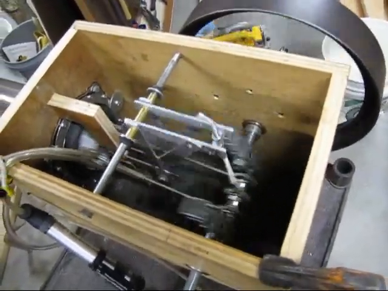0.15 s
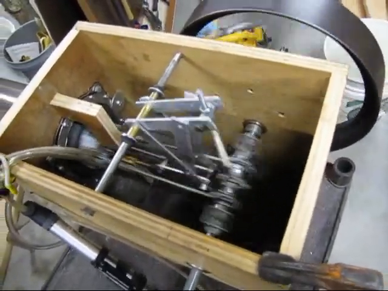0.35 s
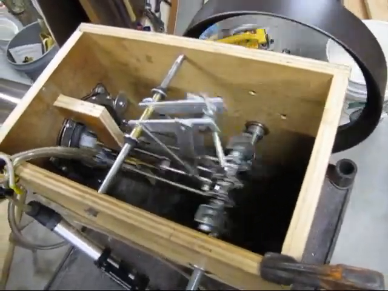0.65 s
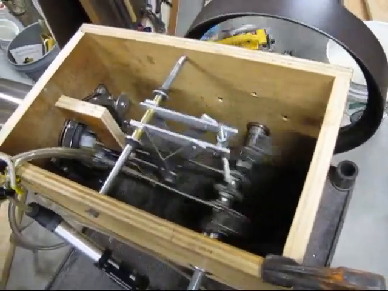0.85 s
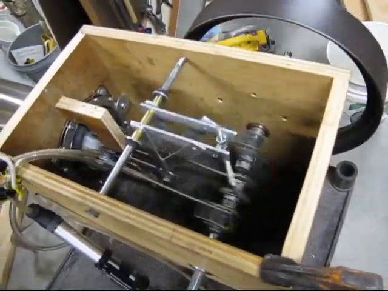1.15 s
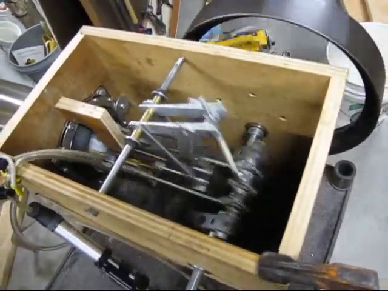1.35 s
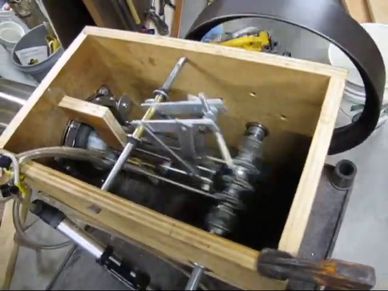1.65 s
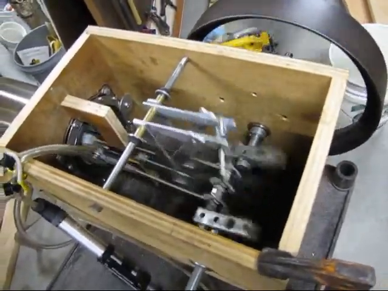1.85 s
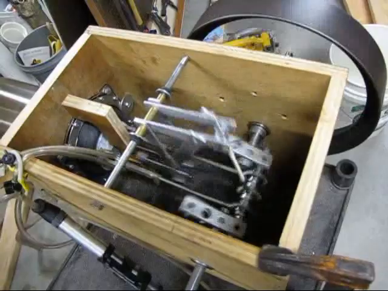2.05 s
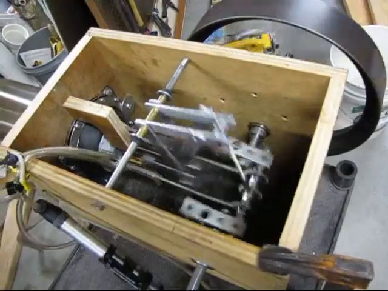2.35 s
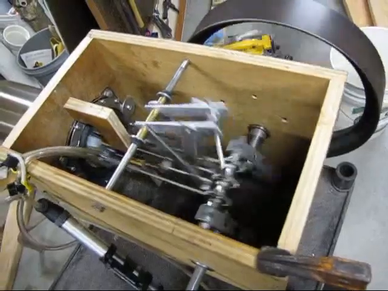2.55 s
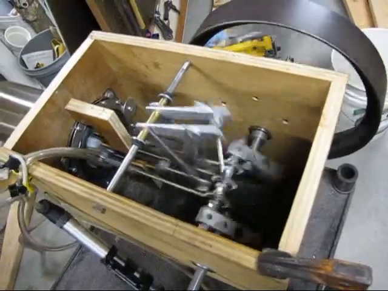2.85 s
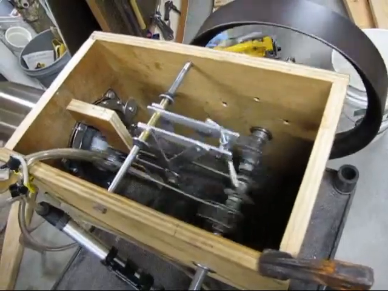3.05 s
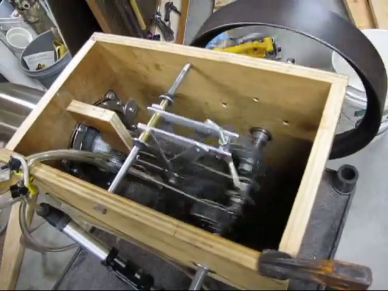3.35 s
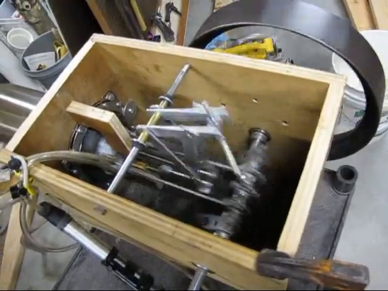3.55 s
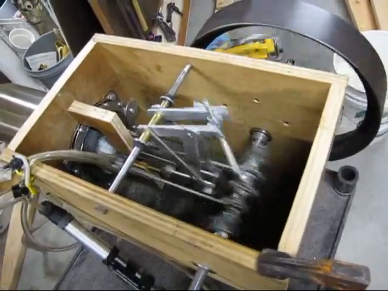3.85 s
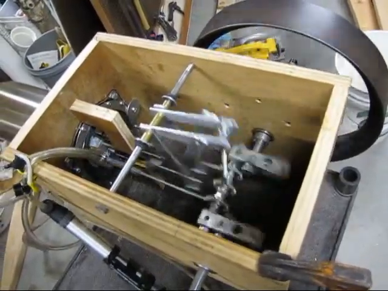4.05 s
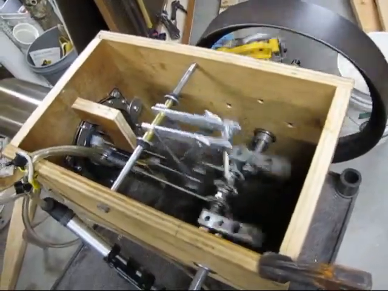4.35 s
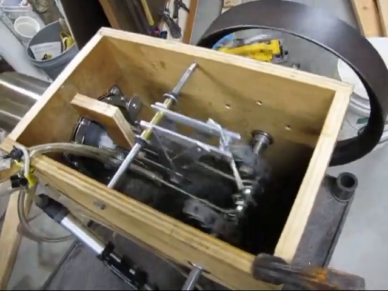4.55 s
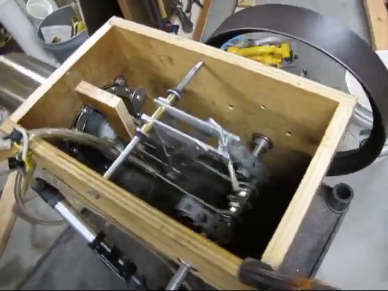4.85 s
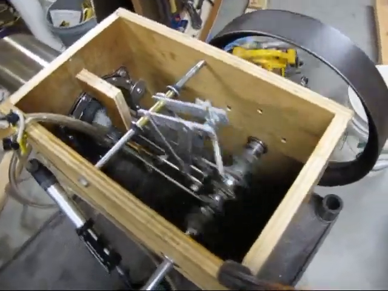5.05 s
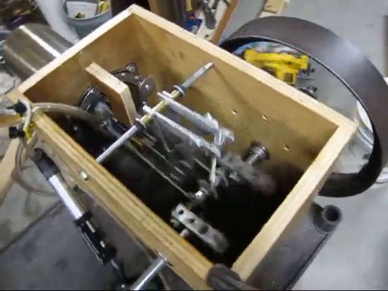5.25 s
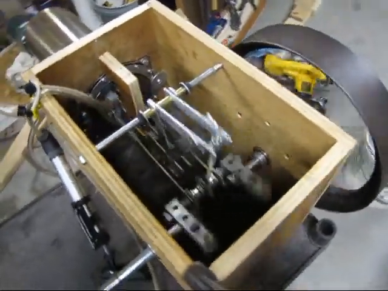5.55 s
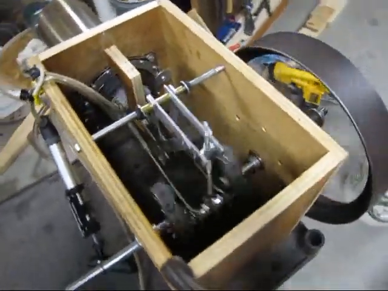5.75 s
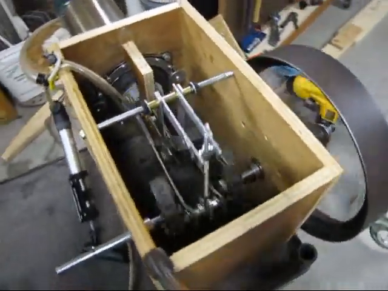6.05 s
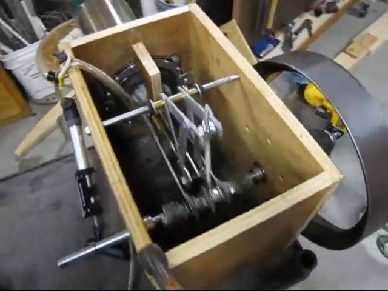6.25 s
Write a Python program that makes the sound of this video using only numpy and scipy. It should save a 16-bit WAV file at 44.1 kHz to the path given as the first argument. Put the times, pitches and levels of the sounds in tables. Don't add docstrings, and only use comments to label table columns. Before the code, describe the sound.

Close metallic ticking, woody thumps and airy puffs repeat about three times a second while a steady burner flame hums behind, then shuts off.

```python
import sys
import numpy as np
from scipy import signal
from scipy.fft import rfft, irfft, next_fast_len
from scipy.io import wavfile
from scipy.ndimage import uniform_filter1d

SR = 44100
rng = np.random.default_rng(int(sys.argv[2]) if len(sys.argv) > 2 else 0)


def nominal_scale(level):
    x = np.asarray(level, float) / 20
    return 10 ** x


def master(y):
    cut = np.clip(np.atleast_2d(y).T, -1, 1)
    pcm = np.round(cut * 32767)
    wavfile.write(sys.argv[1], SR, pcm.astype(np.int16))


N = 282681


def colour(x, points):
    hz, db = np.transpose(points)
    size = next_fast_len(x.shape[-1])
    bins = np.fft.rfftfreq(size, 1 / SR) + 1
    gain = nominal_scale(np.interp(np.log(bins), np.log(hz), db))
    y = irfft(rfft(x, size) * gain, size)[..., :x.shape[-1]]
    return y * np.sqrt(np.mean(x ** 2) / np.mean(y ** 2))


def strikes(times, db):
    train = np.zeros(N)
    places = np.clip((np.asarray(times) * SR).astype(int), 0, N - 1)
    np.add.at(train, places, nominal_scale(db))
    return train


def contact(train, rise_s, fall_s, grit):
    t = np.arange(int(.1 * SR)) / SR
    shape = (1 - np.exp(-(t / rise_s) ** 2)) * np.exp(-t / fall_s)
    shape /= np.sqrt(np.sum(shape ** 2))
    grains = rng.standard_normal(N) * nominal_scale(grit * rng.exponential(size=N))
    return signal.fftconvolve(train, shape)[:N] * grains / grains.std()


def ring(force, modes, lag_s, spread, pan_db):
    out = np.zeros((2, N))
    force = np.atleast_2d(force)
    for k, (hz, db, t60) in enumerate(modes):
        sign = (-1) ** k
        pole = np.exp(2j * np.pi * hz / SR - np.log(1000) / (t60 * SR))
        z = sign * nominal_scale(db) * signal.lfilter([1], [1, -pole], force)
        turn = np.pi * hz * lag_s + spread * sign
        left = nominal_scale(pan_db / 2) * (z[0] * np.exp(-1j * turn)).imag
        right = nominal_scale(-pan_db / 2) * (z[-1] * np.exp(1j * turn)).imag
        out += np.array([left, right])
    return out


def wide_noise(cross_hz):
    mid, side = rng.standard_normal((2, N))
    side = signal.sosfilt(signal.butter(1, cross_hz, "high", fs=SR, output="sos"), side)
    return np.array([mid + side, mid - side]) / np.sqrt(2)


def walk(rate):
    k = int(SR / rate)
    return uniform_filter1d(np.repeat(rng.standard_normal(N // k + 1), k), k)[:N]


def apart(force, share):
    t = np.arange(256) / SR
    echo = rng.standard_normal(len(t)) * np.exp(-t / 0.0031)
    echo /= np.sqrt(np.sum(echo ** 2))
    side = share * signal.fftconvolve(force, echo)[:N] * np.sign(walk(150))
    return np.array([force + side, force - side]) / np.sqrt(1 + share ** 2)


# main blow in seconds, then level above usual in dB of the blow, the rebound,
# the link swinging in and the link swinging back.
TURNS = [(0.1503, 2, -1, -5, -21), (0.478, 0.5, 0.5, -10, -25), (0.803, 0.5, -2, -19, -29),
         (1.1266, 0, -1.5, -25, -26), (1.4504, 2, -2, -21, -24), (1.7708, 1.5, -0.5, -16, -16),
         (2.087, 2, 0, 1, 5), (2.4032, 2, 0, -19, 0), (2.7189, 2.5, 0.5, -21, 3), (3.031, 0, -4.5, 4.5, 9),
         (3.339, 0.5, -2, -5, -0.5), (3.6508, 2, -2, 2, 7), (3.9566, 2, 3, 0.5, 2),
         (4.2634, 2.5, 2, -2, 1.5), (4.565, 3, 3.5, 0, 5), (4.868, 1, 2.5, -4, 3),
         (5.1671, -0.5, -6, 1, 5.5), (5.4685, 1.5, -2, 4.5, -0.5), (5.7664, -0.5, -7, 1, 5.5),
         (6.061, -3.5, -3.5, -0.5, 2), (6.3538, -3.5, -3, 1, 0.5)]
STAGES = ("free", "blow", "rebound", "in", "back")


def each_turn(parts):
    jitter_s, scatter_db = .001, 1.5
    table = np.array(TURNS, float)
    blow_s = table[:, 0].copy()
    s = np.concatenate([[2 * blow_s[0] - blow_s[1]], blow_s, [2 * blow_s[-1] - blow_s[-2]]])
    table[:, 0] = 0
    turn = np.arange(len(table))
    age = turn / turn[-1]
    rows = []
    for stage, first, last, first_db, last_db, *more in parts:
        chance = rng.standard_normal((2, len(turn)))
        place = turn + first + (last - first) * age
        at = np.interp(place, np.arange(len(s)) - 1, s) + jitter_s * chance[0]
        db = first_db + (last_db - first_db) * age
        db = db + table[:, STAGES.index(stage)] + scatter_db * chance[1]
        rows.append(np.array([at, db] + [m + 0 * at for m in more]))
    rows = np.hstack(rows)
    return rows[:, rows[0] < N / SR]


# time in seconds, level in dB.
FLAME = [
    (0, -36),
    (3, -35.5),
    (5.3, -38),
    (5.7, -40),
    (5.85, -44.5),
    (6.41, -44),
]
# frequency in Hz, density in dB per Hz.
FLAME_COLOUR = [(35, -52), (60, -24.5), (265, 1), (406, -15), (532, -4), (697, -11), (1340, -9),
                (2630, -20.5), (3290, -25.5), (6770, -27), (10600, -39), (13000, -70)]


def burner():
    s, db = np.transpose(FLAME)
    flow = nominal_scale(np.interp(np.arange(N) / SR, s, db) + 1.2 * walk(12))
    nozzle = [(5590, 2.5, 0.02), (556, -9, 0.027), (111.5, -16.5, 0.26)]  # Hz, dB, t60 in s
    whistle = ring(rng.standard_normal(N), nozzle, 5e-5, 0.22, 0)
    return flow * (colour(wide_noise(3400), FLAME_COLOUR) + nominal_scale(-27) * whistle)


# frequency in Hz, density in dB per Hz.
SHOP_COLOUR = [(15, -55), (25, -10), (263, 9.5), (520, 5.5), (3080, -12.5), (5630, -10), (9010, -12),
               (10500, -9.5), (13000, -19.5)]


def workshop():
    return nominal_scale(-42.5) * colour(wide_noise(1500), SHOP_COLOUR)


# share of a turn after the puff of air, level in dB.
CLATTER = [
    (0, -2.5),
    (.12, -4),
    (.2, -4),
    (.38, -11.5),
    (.44, 0),
    (.62, 0.5),
    (.7, -4.5),
    (.86, -10),
    (1, -18.5),
]


def clatter():
    t = np.arange(N) / SR
    s = np.transpose(PUFFS)[0]
    turn = np.interp(t, np.append(s, 2 * s[-1] - s[-2]), np.arange(len(s) + 1)) % 1
    level = nominal_scale(np.interp(turn, *np.transpose(CLATTER)) + np.interp(t, [5.2, 6.0], [0, -4]))
    impacts = rng.uniform(-1, 1, N) * (rng.random(N) < .008)
    return level * impacts * nominal_scale(4 * walk(60))


# time in seconds, peak in dB.
PUFFS = [(0.0106, -32), (0.3396, -33.5), (0.6674, -38.5), (0.9926, -37.5), (1.314, -50), (1.634, -33),
         (1.951, -33.5), (2.27, -33.5), (2.5835, -32.5), (2.897, -34), (3.21, -35), (3.52, -34.5),
         (3.827, -33.5), (4.133, -34), (4.4377, -33), (4.743, -33), (5.041, -33), (5.34, -36.5),
         (5.64, -37.5), (5.94, -42), (6.235, -40)]
# frequency in Hz, density in dB per Hz.
PUFF_COLOUR = [(880, -71), (1500, 3), (3790, -6), (4660, -1), (7120, 0.5), (8760, -10), (10100, 6),
               (14300, -33), (15800, -22)]
# frequency in Hz, level in dB, t60 in seconds.
SEAL = [(4840, 7.5, 0.0083), (8020, -9, 0.09), (10700, 2.5, 0.025), (12280, 1.5, 0.02),
        (15220, -1.5, 0.012)]


def seal():
    s, db = np.transpose(PUFFS)
    t = np.arange(int(.06 * SR)) / SR
    burst = np.exp(-((t - .014) / 0.012) ** 2)
    swell = signal.fftconvolve(strikes(s - .006, db), burst)[:N]
    air = colour(wide_noise(3000), PUFF_COLOUR) * nominal_scale(np.array([[-1.5], [1.5]]))
    edge = ring(swell * rng.standard_normal(N), SEAL, 4e-5, 0.53, -3.7)
    return nominal_scale(3.5) * swell * air + nominal_scale(-22.5) * edge


# stage, share of a turn after the main blow at first and at last,
# peak in dB at first and at last, bright pin modes minus peak in dB.
TICKS = [
    ("free", -.284, -.288, -28, -30, -2),
    ("free", -.235, -.23, -31, -33, -4),
    ("free", .44, .44, -31, -34, -12),
    ("rebound", .113, .12, -24, -26, -5),
    ("blow", 0, 0, -18, -19, -10),
    ("blow", .035, .04, -29, -27, -7),
    ("rebound", .121, .127, -18, -18, -7.5),
    ("rebound", .16, .15, -26, -27, -3),
    ("free", .6, .6, -33, -33, 2),
]
# time in seconds, peak in dB.
ROCKER = [(0.215, -25), (0.5444, -23), (0.8694, -20), (1.195, -26), (1.5167, -22.5), (1.8394, -19.5),
          (2.1585, -17), (2.4747, -16.5), (2.79, -16.5), (3.1028, -19), (3.414, -18), (3.7265, -21),
          (4.039, -19), (4.3455, -19.5), (5.5402, -18), (5.8392, -25.5), (6.1345, -21)]
# time in seconds, peak in dB.
REVERSAL = [(0.273, -26), (0.6, -29), (0.9226, -24), (1.245, -25), (1.5688, -21), (1.8886, -20.5),
            (2.2084, -19), (2.5226, -19), (2.836, -21), (3.1501, -22.5), (3.459, -20), (3.771, -23),
            (4.0737, -19.5), (4.3799, -22), (4.6812, -18), (4.9825, -19), (5.283, -22.5), (5.585, -24)]
# time in seconds, peak in dB, bright pin modes minus peak in dB.
STRAYS = [
    (0.3205, -27.5, 0.5),
    (0.616, -21.5, -14),
    (0.6502, -19, -5.5),
    (1.5936, -27, -11),
    (2.546, -27, -14),
]


def all_ticks():
    def with_pin(hits, pin_db):
        return np.vstack([np.transpose(hits), np.full(len(hits), pin_db)])

    return np.hstack([each_turn(TICKS), with_pin(ROCKER, -2.5), with_pin(REVERSAL, -1), np.transpose(STRAYS)])


# frequency in Hz, level in dB, t60 in seconds.
RODS = [(2215, -2, 0.013), (2400, -3, 0.018), (2612, 4.5, 0.0068), (3057, -7, 0.015), (3364, -7.5, 0.012)]
# frequency in Hz, level in dB, t60 in seconds.
PINS = [(4293, 9.5, 0.013), (4620, 8, 0.0075), (5063, 2, 0.026), (5350, 4, 0.01), (6080, -3.5, 0.023),
        (7400, -24, 0.024)]


def joints(play):
    s, db, pin_db = all_ticks()
    dull = contact(strikes(s, db), 0.00044, 0.0085, 2.2) + nominal_scale(-33.0) * play
    rods = ring(apart(dull, 0.42), RODS, 3e-5, 0.11, -3.5)
    bright = contact(strikes(s - .001, db + pin_db), 0.0018, 0.0021, 2.4) + nominal_scale(-35.0) * play
    bright = apart(bright, 0.62)
    pins = ring(bright, PINS, 3e-5, 0.21, -1.7)
    crack = colour(bright, [(1500, 13), (3500, 16.5), (7000, 15.5), (11000, -2.5)])
    return nominal_scale(-1.5) * rods + nominal_scale(-7.5) * pins + nominal_scale(15.5) * crack


# stage, share of a turn after the main blow at first and at last,
# peak in dB at first and at last.
THUMPS = [
    ("free", -.232, -.235, -24, -24),
    ("free", -.19, -.19, -20.5, -27.5),
    ("free", -.125, -.125, -27, -30),
    ("blow", 0.0093, 0.0088, -16.5, -16),
    ("blow", 0.0409, .05, -28.5, -27),
    ("rebound", 0.14, .152, -17.5, -25),
    ("blow", 0.0822, .08, -25, -27),
    ("free", .378, .382, -35, -33.5),
]
# stage, share of a turn after the main blow at first
# and at last, peak in dB at first and at last.
KNOCKS = [
    ("free", -0.237, -0.2097, -24, -29.5),
    ("blow", 0.01, 0.01, -18.5, -20),
    ("blow", 0.0605, 0.058, -36, -28.5),
    ("rebound", .148, 0.1384, -19, -20),
    ("blow", 0.0018, 0.0028, -27, -31.5),
    ("free", .6, .6, -28.5, -40.5),
]
# frequency in Hz, level in dB, t60 in seconds.
BOX_LOW = [(222.4, 0.5, 0.098), (223.2, -0.5, 0.095), (268, 7.5, 0.058), (348.6, 2, 0.036)]
# frequency in Hz, level in dB, t60 in seconds.
BOX_HIGH = [(544.3, -2.5, 0.078), (626, -8, 0.11), (700.6, -1.5, 0.051), (824, 2.5, 0.03), (958, -1, 0.027),
            (1041, -5, 0.044), (1320, 6, 0.014), (1369, -2, 0.058), (1552, 4.5, 0.014), (1879, -8.5, 0.036)]


def box(play):
    s, db = each_turn(THUMPS)
    blows = strikes(s, db)
    push = signal.fftconvolve(blows, np.hanning(80) / 40)[:N]
    push = push + 0.32 * contact(blows, 0.0073, 0.0036, 0)
    low = ring(push, BOX_LOW, 2.5e-5, 0.015, -0.066)
    reversal = np.transpose(REVERSAL) + [[.002], [-4]]
    s, db = np.hstack([each_turn(KNOCKS), reversal])
    knocks = contact(strikes(s - .003, db), 0.0018, 0.012, 1.3)
    high = ring(knocks + nominal_scale(-31.5) * play, BOX_HIGH, 3e-5, 0.09, 0)
    return nominal_scale(-2.5) * low + nominal_scale(-3.5) * high


# stage, share of a turn after the main blow at first and at last,
# peak in dB at first and at last, high modes minus peak in dB.
RATTLES = [
    ("free", -0.21, -0.21, -26, -34, -7.5),
    ("free", -0.12, -0.073, -36.5, -35, -12),
    ("in", -0.041, -0.025, -28.5, -22.5, -4.5),
    ("free", 0.0084, 0.057, -32.5, -28, -9.5),
    ("back", 0.074, .12, -32, -20, -9.5),
    ("free", 0.15, 0.18, -28, -45, -13),
]
# frequency in Hz, level in dB, t60 in seconds.
LINK = [(6696, 1, 0.035), (6712, 6.5, 0.0085), (7300, -8, 0.015)]
# frequency in Hz, level in dB, t60 in seconds.
LINK_HIGH = [(8860, -4, 0.0088), (9268, 2, 0.018), (10250, -3, .012), (13150, -12.5, 0.094),
             (14600, 0, 0.073)]


def link():
    s, db, high_db = each_turn(RATTLES)
    rise_s, grit_db = .008, 2.4
    buzz = apart(contact(strikes(s - .009, db), rise_s, 0.008, grit_db), 0.43)
    high_buzz = apart(contact(strikes(s - .009, db + high_db), rise_s, 0.0089, grit_db), 0.35)
    main = ring(buzz, LINK, 6e-5, 0.39, 0)
    high = ring(high_buzz, LINK_HIGH, 5e-5, 0.73, -5.5)
    fizz = colour(buzz, [(4000, -56), (7000, -18), (10500, 26)])
    return nominal_scale(5) * main + nominal_scale(8) * high + nominal_scale(0.5) * fizz


def room(engine):
    t60_s, level_db = 0.29, -13
    t = np.arange(int(.5 * SR)) / SR
    tail = wide_noise(1800)[:, :len(t)] * np.exp(-np.log(1000) * t / t60_s) * (t > .003)
    tail = colour(tail, [(60, 25.5), (1000, -7), (5000, -6), (14000, -33.0)])
    tail /= np.sqrt(np.sum(tail[0] ** 2))
    return nominal_scale(level_db) * signal.fftconvolve(engine.mean(axis=0)[None], tail, axes=1)[:, :N]


def scene():
    play = clatter()
    bass_cut = signal.butter(4, 165, "high", fs=SR, output="sos")
    treble_cut = signal.butter(6, 11300, fs=SR, output="sos")
    boxed = joints(play) + box(play) + link()
    engine = signal.sosfilt(np.vstack([bass_cut, treble_cut]), boxed) + seal()
    return engine + room(engine) + burner() + workshop()


def roll_off(x):
    return signal.sosfilt(signal.butter(12, 15970, fs=SR, output="sos"), x)


def record(dry):
    hz, _, z = signal.stft(dry, SR, nperseg=2048)
    power = uniform_filter1d(np.mean(abs(z) ** 2, axis=0), size=8, axis=0)
    total = power.sum(axis=0)
    busy = (total / total.mean()) ** 0.67
    floor_db = np.interp(hz, [9500, 11600, 13000, 15800, 15900], [-210, -156, -157, -150, 0])
    audible = power > busy * nominal_scale(floor_db)[:, None]
    mix = signal.istft(z * audible, SR, nperseg=2048)[1][:, :N]
    return roll_off(mix)


dry = scene()
out = record(dry)
master(out)
```